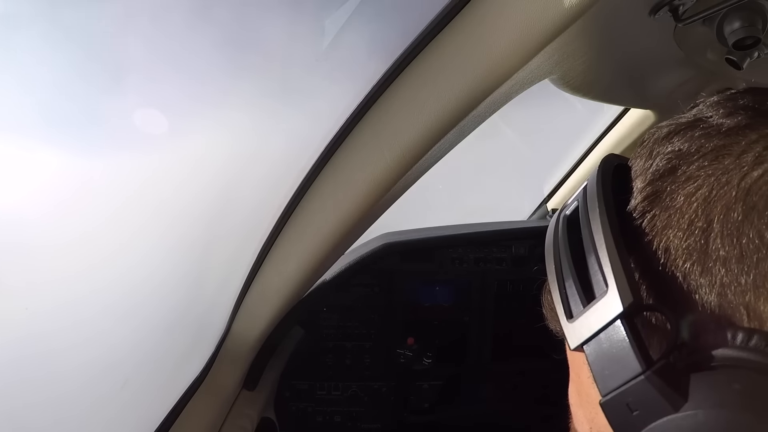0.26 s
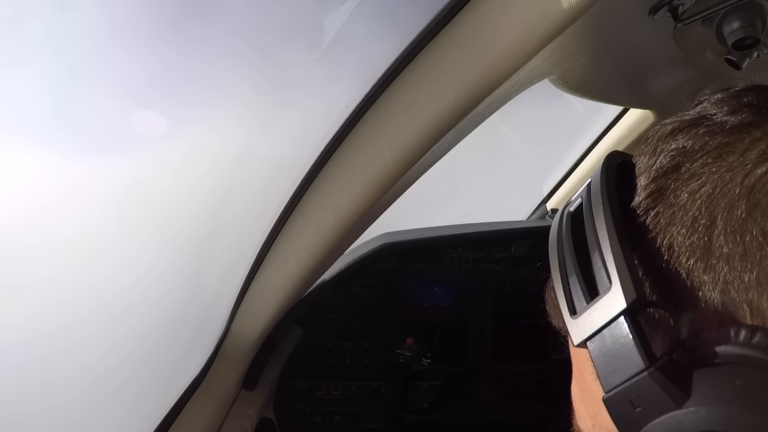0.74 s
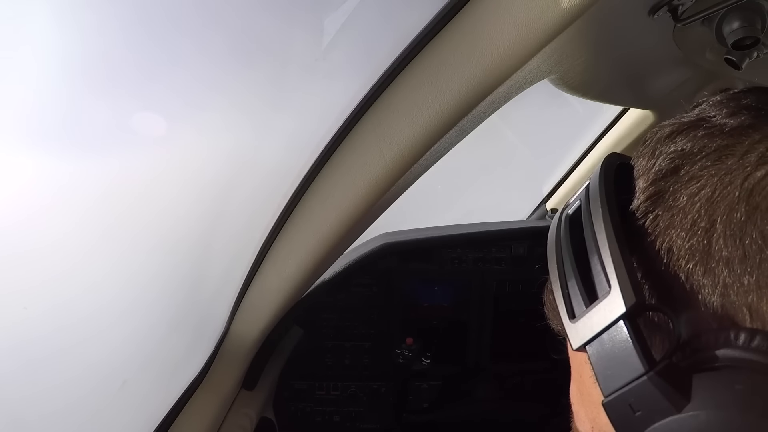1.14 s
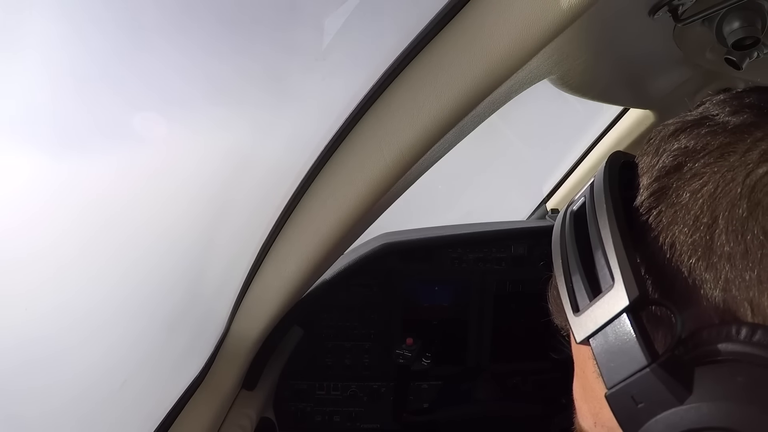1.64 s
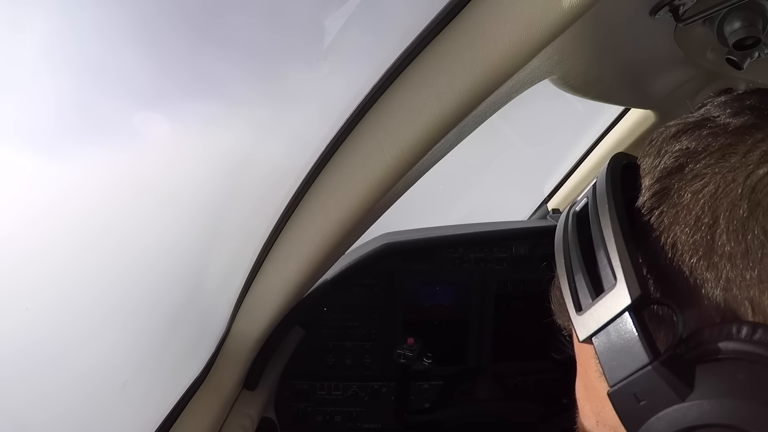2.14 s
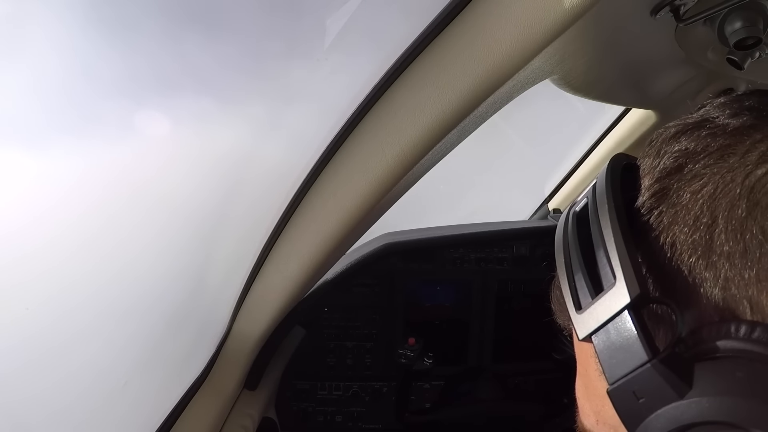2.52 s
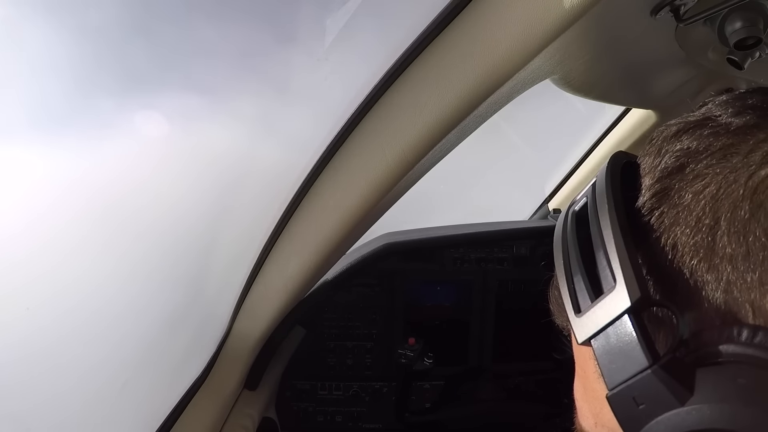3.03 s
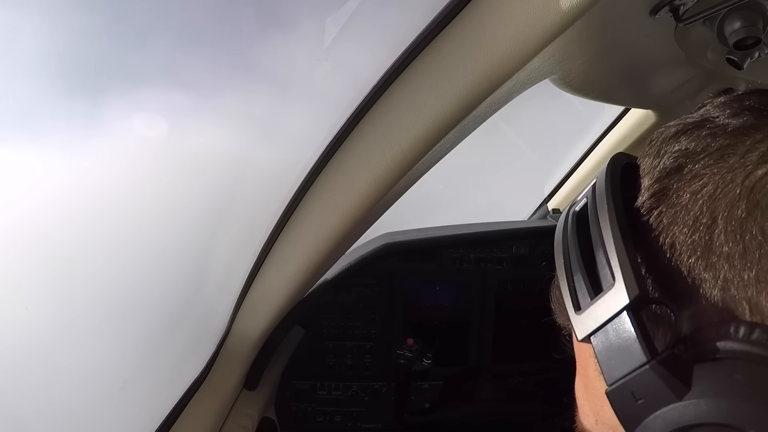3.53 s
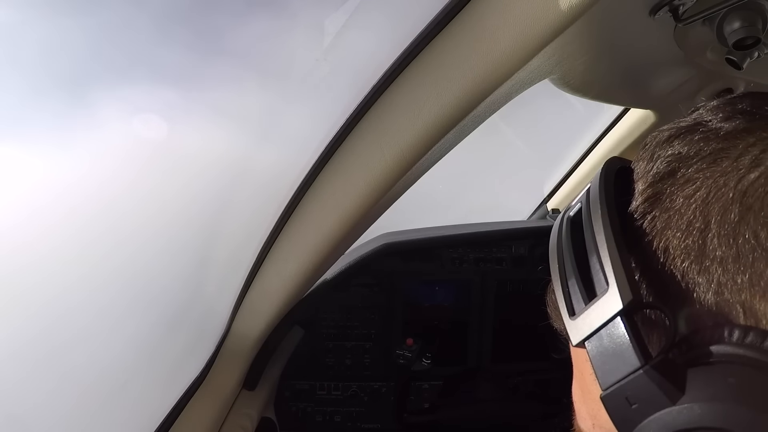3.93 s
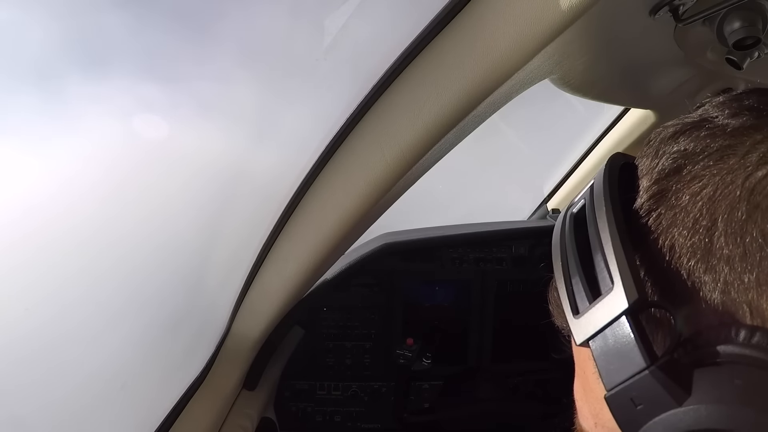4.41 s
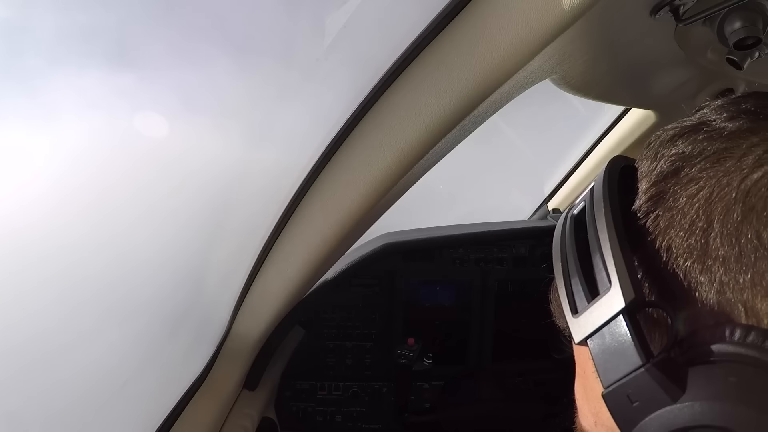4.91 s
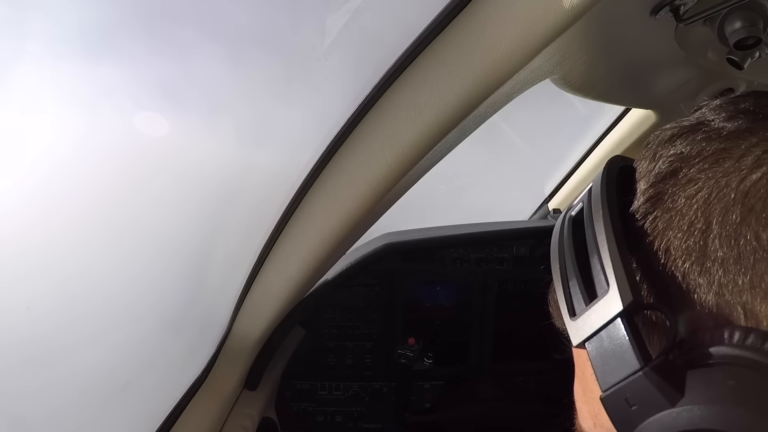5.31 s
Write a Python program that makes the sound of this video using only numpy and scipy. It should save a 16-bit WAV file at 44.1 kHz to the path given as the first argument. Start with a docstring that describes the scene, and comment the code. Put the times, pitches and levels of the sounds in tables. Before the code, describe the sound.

Steady deep boom and rush of airflow inside a small jet cockpit, with the even hum of twin engines underneath.

```python
"""The fuselage of a small jet booms in the climb, heard in the cockpit by a camera beside the side window.
The turbulent boundary layer shakes the skin, sets the cabin air droning, rings the panels and rushes
over the windshield, all gently swelling and easing. Shafts and pumps hum through the frame.
The camera's electronics add a steady deep tone, a whistle swept by that tone, and hiss."""
import sys
import numpy as np
from scipy import signal
from scipy.fft import rfft, irfft, next_fast_len
from scipy.io import wavfile
from scipy.ndimage import uniform_filter1d, map_coordinates

SR = 44100
rng = np.random.default_rng(int(sys.argv[2]) if len(sys.argv) > 2 else 0)


def unload_wav(signal):
    """Save mono or channel-first audio to the path in sys.argv[1] as 16-bit WAV at rate SR, clipped to [-1, 1]."""
    wavfile.write(
        sys.argv[1],
        SR,
        np.round(np.clip(np.atleast_2d(signal).T, -1, 1) * 32767).astype(np.int16),
    )


N = 245195
T = np.arange(N) / SR

# The airflow swells and eases. Each row: time in seconds, level change of the rush in dB.
AIRFLOW_SWELL = [(0, .1), (.25, -1), (.55, 0), (.9, 0.7), (1.2, -1.5), (1.5, -.9), (1.7, -0.2), (2.2, -0.9),
                 (2.6, -0.4), (3.05, 0.3), (3.3, 0), (3.65, 0.7), (4.2, -1.1), (4.8, 0.05), (5.56, 0.1)]


def amp(db):
    """Gain of a dB value."""
    return 10 ** (np.asarray(db) / 20)


def fader(points, depth=1):
    """Gain riding through (seconds, dB) points; depth scales the dB moves."""
    return amp(depth * np.interp(T, *np.transpose(points)))


def wobble(rate):
    """A smooth random curve, rate knots a second."""
    return map_coordinates(rng.standard_normal(int(N * rate / SR) + 4), [T * rate])


def filtered(x, response):
    """x through an EQ given as a complex response of frequency."""
    size = next_fast_len(N + SR // 2)
    return irfft(rfft(x, size) * response(np.fft.rfftfreq(size, 1 / SR)), size)[..., :N]


def along(hz, freqs, values):
    """A curve through values at freqs, read at hz on a log axis."""
    return np.interp(np.log(hz + 1), np.log(np.add(freqs, 1)), values)


def patchy_noise(patchy_db):
    """Two white noises near 0 dB per Hz, sharing patches of random gain in time and frequency."""
    spectra = signal.stft(rng.standard_normal((2, N)), nperseg=512)[2]
    patches = uniform_filter1d(rng.standard_normal(spectra.shape[1:]), size=5, axis=0)
    patches = uniform_filter1d(patches, size=8, axis=1)
    spectra *= amp(patchy_db * patches / patches.std())
    return signal.istft(spectra, nperseg=512)[1][:, :N] * np.sqrt(SR / 2)


def air_noise(spectrum, low_hz, high_hz, patchy_db):
    """Stereo noise between two soft edges; the right hears the left's sound phase-shifted, plus its own."""
    freqs, left_db, right_db, coherence, lead = np.transpose(spectrum)
    common, separate = patchy_noise(patchy_db)
    band = lambda hz: np.sqrt(1 / (1 + (low_hz / (hz + 1)) ** 40) / (1 + (hz / high_hz) ** 40))
    share = lambda hz: np.clip(along(hz, freqs, coherence), 0, 1)
    right_eq = lambda hz: band(hz) * amp(along(hz, freqs, right_db))
    left = filtered(common, lambda hz: band(hz) * amp(along(hz, freqs, left_db)))
    shared = filtered(common, lambda hz: right_eq(hz) * share(hz) * np.exp(-1j * along(hz, freqs, lead)))
    own = filtered(separate, lambda hz: right_eq(hz) * np.sqrt(1 - share(hz) ** 2))
    return np.array([left, shared + own])


def ringing(modes):
    """Turbulence rings each mode as a narrow band of stereo noise."""
    out = np.zeros((2, N))
    for hz, width, left_db, right_db, lead in modes:
        stereo_phase = np.exp(-1j * lead * np.array([[0], [1]]))
        ring = filtered(rng.standard_normal(N), lambda f: stereo_phase / (1 + (2 * (f - hz) / width) ** 2))
        out += amp([[left_db], [right_db]]) * ring / ring.std()
    return out


def camera_electronics():
    """Dead centre: a deep tone, a whistle whose pitch it swings through zero, and bright hiss."""
    # Each row: frequency in Hz, hiss level in dB per Hz.
    hiss_spectrum = [(6500, -118), (8300, -106), (11000, -104.5), (15000, -102.5)]
    tone_hz, centre_hz, sweep_hz = 31.99946, 5.72, 16487
    tone = amp(-28.5) * np.sqrt(2) * np.cos(2 * np.pi * (tone_hz * T + .473))
    sweep_phase = 2 * np.pi * (tone_hz * T - .16915)
    pitch = centre_hz + sweep_hz * np.cos(sweep_phase)
    phase = 2 * np.pi * centre_hz * T + sweep_hz / tone_hz * np.sin(sweep_phase)
    whistle = amp(-64.7) * np.sqrt(2) * np.abs(pitch) / 14000 * np.cos(phase)  # louder as it climbs
    hiss = filtered(patchy_noise(patchy_db=.45)[0], lambda hz: amp(along(hz, *np.transpose(hiss_spectrum))))
    return tone + whistle + hiss


def machinery():
    """Shafts and pumps hum through the frame, each wavering in level and drifting in phase."""
    # The close pair is the two engines beating. Each row: pitch in Hz, left and right level in dB,
    # then the left's phase lead, start phase and phase drift in radians.
    hums = [(265.57, -51, -45.3, .4, 0, .1), (571.83, -69.5, -55.4, 2.4, 0, .1),
            (572.51, -72.5, -57.3, 2.4, 1.28, .1), (692.32, -67.5, -53.8, 3.9, 0, .9)]
    out = np.zeros((2, N))
    for hz, left_db, right_db, lead, start, drift in hums:
        phase = 2 * np.pi * hz * T + start + drift * wobble(rate=.9)
        level_db = .4 * wobble(rate=2.45) + [[left_db], [right_db]]
        out += amp(level_db) * np.sqrt(2) * np.sin(phase - [[0], [lead]])
    return out


def panel_ring():
    """The airflow sways the airframe and rings side panels and windshield frame, exaggerating each swell."""
    # Each row: pitch and width in Hz, left and right level in dB, the left's phase lead in radians.
    panel_modes = [(20.4, 3.6, -37.8, -37.8, 0), (788, 28, -65, -54.8, 4.2), (1262, 52, -59, -60, -.9),
                   (6150, 700, -77.5, -77.5, 0)]
    return fader(AIRFLOW_SWELL, depth=1.8) * ringing(panel_modes)


def windshield_rush():
    """Air streams over the glass: the mids and highs of the bed."""
    # Each row: frequency in Hz, left and right level in dB per Hz, coherence from 0 to 1,
    # the left's phase lead in radians.
    rush_spectrum = [(845, -84, -75.5, 0.4, -2), (915, -81.5, -74.5, .5, -1.3),
                     (950, -84.5, -77.5, 0.52, -0.8), (1000, -83, -76.5, .7, -.8), (1110, -82, -77, .7, -1),
                     (1165, -82, -81, .72, -1), (1200, -80, -78, .75, -1), (1240, -82, -80.5, 0.8, -1),
                     (1320, -82.5, -82.5, .6, -1.3), (1365, -82.5, -79.5, .58, -1.6),
                     (1410, -83.5, -84, .6, -1.7), (1550, -84, -82.5, 0.7, -1.3),
                     (1700, -87.5, -88, .4, -1.4), (1830, -86.5, -88, 0.2, -2.8),
                     (2150, -90.5, -91.5, .08, -2.6), (2300, -93.5, -92, 0.4, 0),
                     (2480, -92, -92.5, .35, 0), (2700, -94.5, -94.5, .5, 0), (2890, -94, -92.5, 0.7, 0),
                     (3300, -97.5, -97.5, .75, 0), (3800, -101.5, -101.5, 0.68, 0),
                     (4250, -100, -99.5, 0.72, 0), (4850, -102.3, -103.3, 0.45, 0),
                     (5600, -101, -101.2, .25, 0), (6850, -99.2, -101.5, 0.08, 0),
                     (7640, -103, -103.3, 0.3, 0)]
    return fader(AIRFLOW_SWELL) * air_noise(rush_spectrum, low_hz=810, high_hz=7800, patchy_db=.7)


def cabin_drone():
    """The airflow rings the cabin air: a low drone that swells on its own."""
    # Each row: pitch and width in Hz, left and right level in dB before the lift,
    # the left's phase lead in radians.
    cabin_modes = [(129, 32, -42.8, -40.2, -.1), (159, 14, -46.7, -44.7, -.3)]
    # Each row: time in seconds, level change in dB.
    drone_swell = [(0, -0.5), (.75, 1.5), (1.4, 0), (1.8, -2), (2.5, 3.5), (3.05, 3), (3.4, -0.5), (3.8, 2),
                   (4.5, -1), (4.9, -1.5), (5.56, 0)]
    lift_db = 1.5
    return amp(lift_db) * fader(drone_swell) * ringing(cabin_modes)


def fuselage_boom():
    """The boundary layer shakes the fuselage: a broad, deep boom that softly follows the swell."""
    # Each row: frequency in Hz, left and right level in dB per Hz, coherence from 0 to 1,
    # the left's phase lead in radians.
    boom_spectrum = [(12, -72, -72, 1, 0), (27, -62, -62, 1, 0), (36, -55.5, -55.5, 1, 0),
                     (46, -58.5, -58.5, 0.95, 0), (56, -56, -55.3, .88, -.1), (75, -56, -54.5, 0.8, -0.2),
                     (107.5, -56.5, -54, 0.92, -0.1), (172, -61, -58, 0.97, 0),
                     (181, -61.3, -58.3, .96, .1), (192, -65, -62, .95, .1), (215, -67.5, -64, 0.94, 0),
                     (240, -66, -62, .7, .4), (262, -68.5, -60.5, 0.9, 0.5), (310, -68, -63.5, 0.86, 0),
                     (345, -71.5, -65.5, .8, .8), (432, -72, -63.5, 0.95, 1.4), (480, -76, -68, .86, 1.5),
                     (512, -78, -70.5, 0.42, 1.6), (550, -74, -67, 0.8, 2.6), (590, -75.5, -68.5, .87, 3),
                     (615, -80, -69.5, .84, 3), (680, -79, -72.5, 0.66, 3.6), (715, -78, -73, .75, 3.7),
                     (760, -81, -75, 0.55, 4.2)]
    return fader(AIRFLOW_SWELL, depth=.74) * air_noise(boom_spectrum, low_hz=5, high_hz=834, patchy_db=.2)


def scene():
    """The cockpit in stereo, plus the camera's own noise."""
    airflow = fuselage_boom() + windshield_rush() + panel_ring() + cabin_drone()
    return airflow + machinery() + camera_electronics()


def record(dry):
    """Soft-clips the tallest bass peaks; the very top steps down 4 dB, then cuts off."""
    ceiling, hardness, bass_hz, top_hz = .138, 5, 400, 15310
    clipped = dry / (1 + np.abs(dry / ceiling) ** hardness) ** (1 / hardness)
    held = dry + filtered(clipped - dry, lambda hz: 1 / (1 + (hz / bass_hz) ** 8))
    return filtered(held, lambda hz: amp(-4 * np.clip((hz - 14950) / 100, 0, 1)) * (hz < top_hz))


dry = scene()
out = record(dry)
unload_wav(out)
```